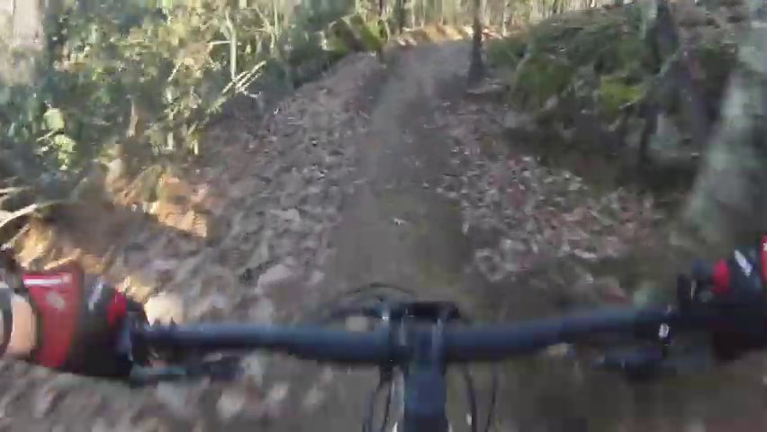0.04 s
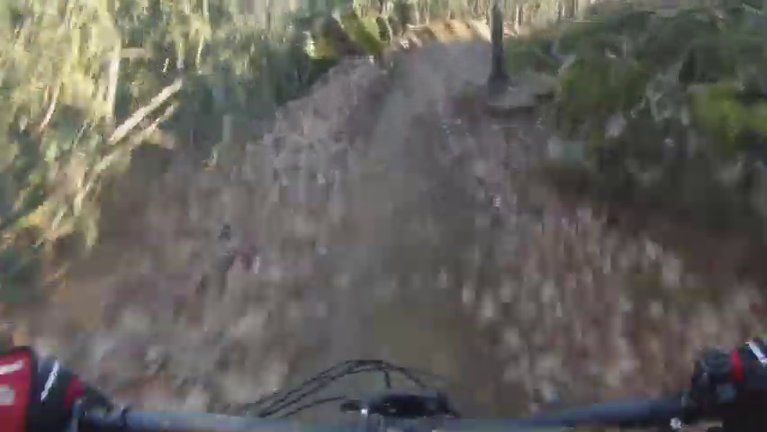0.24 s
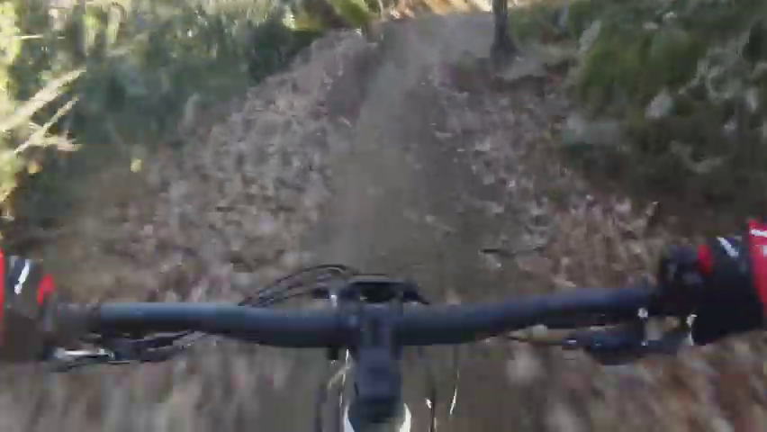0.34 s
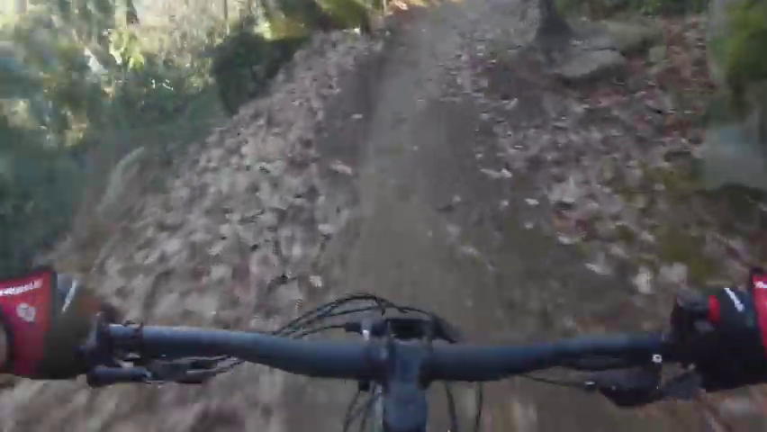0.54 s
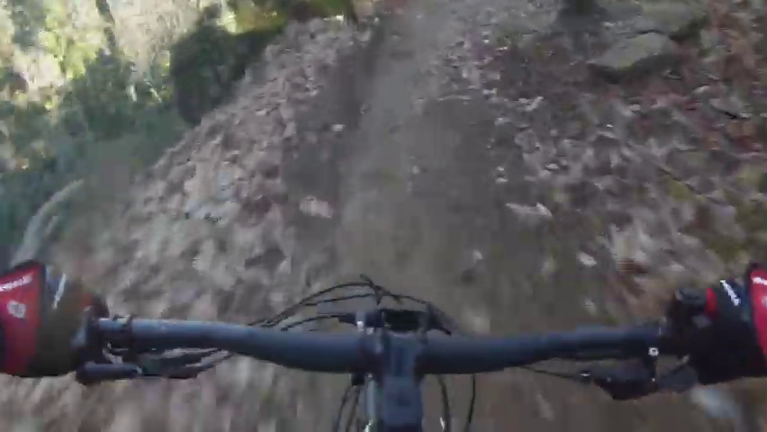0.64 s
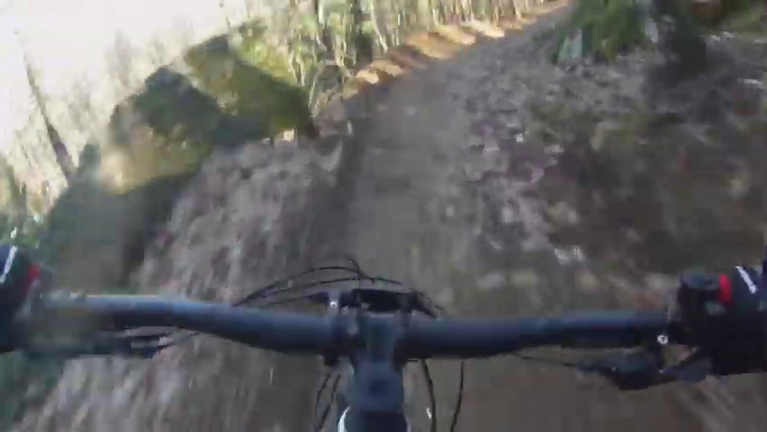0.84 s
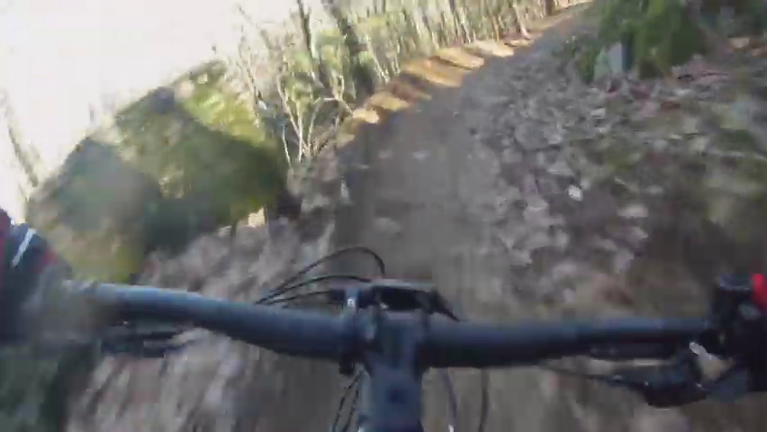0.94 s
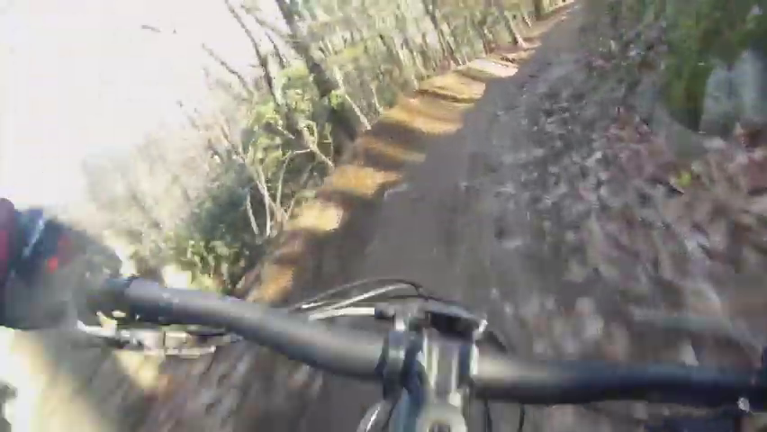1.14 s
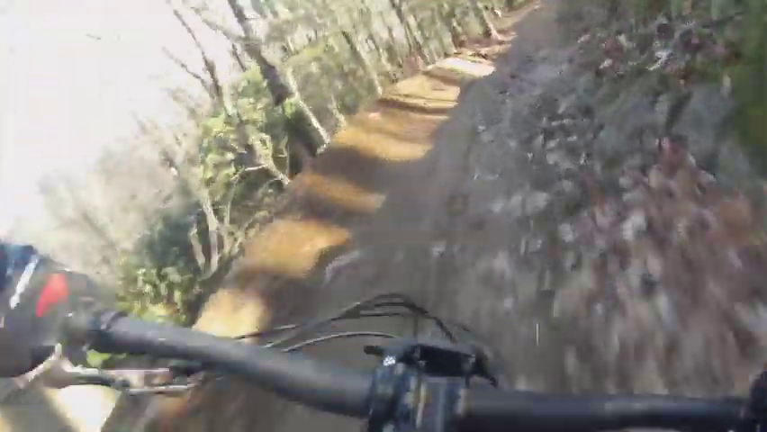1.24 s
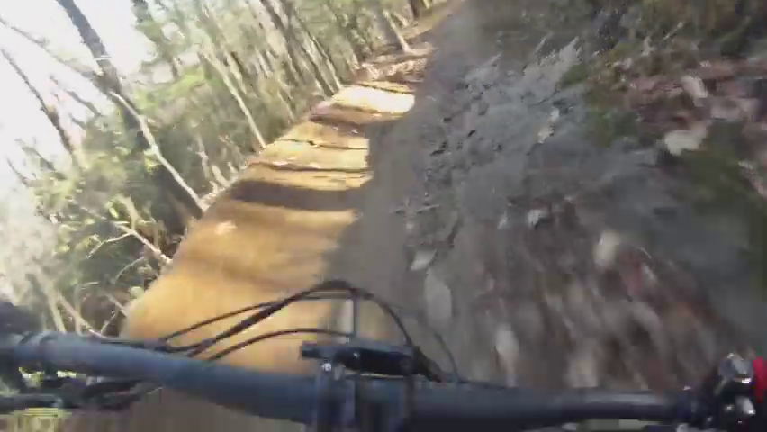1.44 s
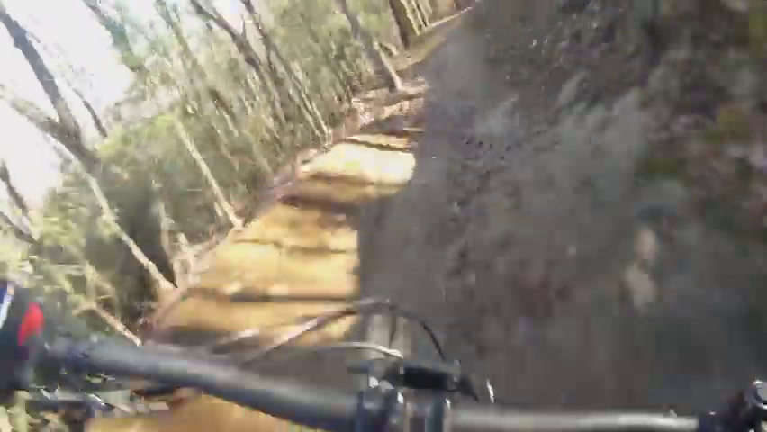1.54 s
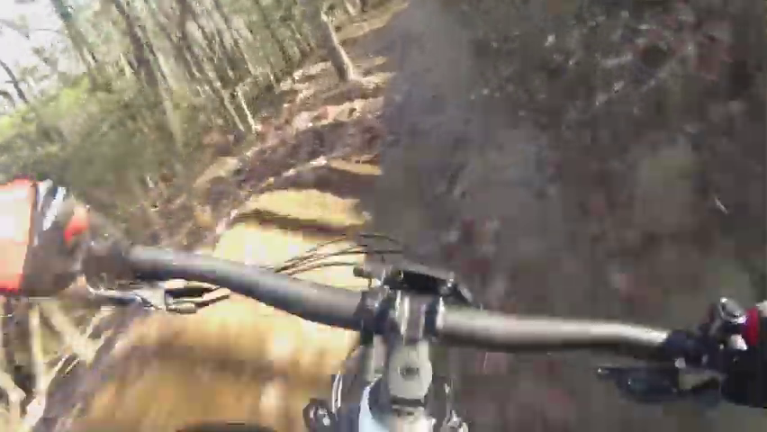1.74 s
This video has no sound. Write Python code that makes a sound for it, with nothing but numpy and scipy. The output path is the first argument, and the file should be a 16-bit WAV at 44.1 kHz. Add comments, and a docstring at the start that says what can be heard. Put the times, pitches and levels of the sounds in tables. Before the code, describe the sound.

A mountain bike knocks and rattles over a dirt trail, with wind buffeting the microphone.

```python
"""A dirt trail, heard from a camera strapped to the chest of a mountain biker riding down it.
Wind buffets the microphone; the tyres rush over dirt and throw up grit and leaves. Bumps thud
through the rider, ping the bike's metal, scuff the harness and make the camera shudder and knock
in its mount. The small plastic housing colours crunch, scuffs and knocks; the hardest knocks overload."""
import sys
import numpy as np
from scipy import signal
from scipy.fft import rfft, irfft
from scipy.io import wavfile

SR = 44100
rng = np.random.default_rng(int(sys.argv[2]) if len(sys.argv) > 2 else 0)


def to_wav(s):
    """Save 16-bit WAV."""
    ch = np.atleast_2d(s).T  # columns
    pcm = np.round(np.clip(ch, -1, 1) * 32767)  # PCM
    wavfile.write(sys.argv[1], SR, pcm.astype(np.int16))


N = 79380
TIME_S = np.arange(N) / SR
METAL_HZ, METAL_WIDTH_HZ = 4720, 160  # ring of the bike's metal parts


def from_db(db):
    """Decibels to gain."""
    return 10 ** (np.asarray(db) / 20)


def unit_rms(x):
    """Scale to unit rms."""
    return x / np.sqrt(np.mean(x ** 2) + 1e-20)


def gain_curves(rows):
    """One gain curve per level column; rows: time_s, level_db, ..."""
    times_s, *columns_db = np.transpose(rows)
    return [from_db(np.interp(TIME_S, times_s, db)) for db in columns_db]


def swells(rows):
    """Envelope of lopsided bell curves, summed in power."""
    power = 0
    for peak_s, level_db, rise_s, fall_s in rows:
        width_s = np.where(TIME_S < peak_s, rise_s, fall_s)
        power += from_db(level_db) ** 2 * np.exp(-2 * ((TIME_S - peak_s) / width_s) ** 2)
    return np.sqrt(power)


def lowpass(x, cutoff_hz, order=2):
    """Butterworth low-pass."""
    return signal.sosfilt(signal.butter(order, cutoff_hz, fs=SR, output="sos"), x)


def drift(rate_hz):
    """Random wander, unit rms."""
    return unit_rms(lowpass(rng.standard_normal(N + SR), rate_hz)[SR:])


def colour(x, points, size=8192):
    """Minimum-phase filter; points: freq_hz, gain_db."""
    freq_hz, gain_db = np.transpose(points)
    bins_hz = np.fft.rfftfreq(size, 1 / SR)
    curve_db = np.interp(np.log(bins_hz + 1), np.log(freq_hz), gain_db)
    cepstrum = irfft(np.log(from_db(curve_db)))
    cepstrum[1:size // 2] *= 2
    cepstrum[size // 2 + 1:] = 0
    return signal.fftconvolve(x, irfft(np.exp(rfft(cepstrum))))[:len(x)]


def resonance(x, centre_hz, width_hz, boost_db):
    """Lift one band so it rings; a negative boost cuts it."""
    band = signal.lfilter(*signal.iirpeak(centre_hz, centre_hz / width_hz, fs=SR), x + 1e-18)
    return x + (from_db(boost_db) - 1) * band


def grains(rate_per_s, spread_db):
    """Tiny clicks at random times."""
    sizes = from_db(spread_db * np.minimum(rng.exponential(1, N), 4)) * rng.choice([-1, 1], N)
    return sizes * (rng.random(N) < rate_per_s / SR)


def housing(x):
    """Resonances of the plastic housing, in series."""
    # modes: centre_hz, width_hz, boost_db
    modes = [(636, 23, 2.5), (1496, 184, 4.5), (2087, 67, 0.5), (2366, 250, 5), (3780, 270, 10),
             (4720, 720, 6), (6150, 600, 4), (11600, 1100, 8)]
    for mode in modes:
        x = resonance(x, *mode)
    return x


def wind(lump_db=2.5, lump_hz=30):
    """Air rushing past the microphone: slow buffeting and a lumpy rumble."""
    # wind strength: time_s, buffet_db, rumble_db
    levels = [(0, -50, -53), (0.07, -42, -48.5), (0.15, -33, -36.5), (0.26, -43, -41), (0.31, -42.5, -56.5),
              (0.38, -51.5, -57), (0.43, -38, -57), (0.48, -48, -59), (0.60, -49.5, -55.5),
              (0.76, -53.5, -51), (0.85, -39.5, -56.5), (0.96, -29, -46.5), (1.04, -37.5, -41),
              (1.16, -30.5, -48), (1.39, -33.5, -41.5), (1.49, -38, -37.5), (1.56, -49.5, -55),
              (1.8, -51, -55)]
    # buffet and rumble spectra: freq_hz, gain_db
    buffet_colour = [(8, -9), (21, -3), (42, -15.5), (70, -16.5), (150, -31), (500, -90.5)]
    rumble_colour = [(25, -50), (60, -7.5), (120, -6), (210, -9), (330, -21.5), (600, -25.5), (2000, -51)]
    buffet_gain, rumble_gain = gain_curves(levels)
    buffet = unit_rms(colour(rng.standard_normal(N + SR), buffet_colour)[SR:])
    rumble = colour(rng.standard_normal(N + SR), rumble_colour)[SR:]
    lumps = from_db(lump_db * drift(lump_hz))
    return buffet_gain * buffet + rumble_gain * unit_rms(rumble * lumps)


def tyres(flutter_db=2, flutter_hz=40):
    """Tread crunches over dirt; the bike's metal sings along."""
    # tyre rush: time_s, level_db
    levels = [(0, -51.5), (0.16, -44.5), (0.27, -83), (0.30, -53), (0.42, -53.5), (0.49, -54.5),
              (0.58, -56), (0.72, -56.5), (0.77, -51.5), (0.87, -49.5), (0.95, -47), (1.06, -49.5),
              (1.19, -41.5), (1.31, -42.5), (1.42, -36.5), (1.52, -39), (1.58, -56.5), (1.8, -58)]
    # crunch spectrum: freq_hz, gain_db
    crunch_colour = [(100, -25), (300, -10), (520, -10.5), (900, -6), (1450, 4), (2200, -2.5),
                     (2900, -10.5), (4500, -24), (6800, -22.5), (9500, -36), (12500, -35.5), (15000, -78)]
    gain, = gain_curves(levels)
    crunch = housing(colour(grains(rate_per_s=4700, spread_db=1.5), crunch_colour))
    crunch = resonance(crunch, METAL_HZ, METAL_WIDTH_HZ, boost_db=7)
    flutter = from_db(flutter_db * drift(flutter_hz))
    return gain * flutter * unit_rms(crunch)


def sprays():
    """Grit and dry leaves thrown up by the tread."""
    # bursts: peak_s, level_db, rise_s, fall_s
    bursts = [(0.362, -61.5, 0.011, .006), (0.89, -63, 0.021, 0.0089), (1.037, -51.5, 0.0051, 0.013),
              (1.130, -59.5, 0.024, .008), (1.182, -53, 0.0046, 0.015), (1.222, -54.5, .003, 0.011),
              (1.262, -51.5, 0.0079, 0.021), (1.308, -46.5, 0.0041, 0.01), (1.345, -43.5, 0.0021, 0.012),
              (1.370, -43.5, .006, 0.015)]
    # grit spectrum: freq_hz, gain_db
    grit_colour = [(1000, -19.5), (3500, -1.5), (6500, 3), (9000, -6.5), (12000, -11.5), (15000, -19.5)]
    grit = colour(grains(rate_per_s=6100, spread_db=5), grit_colour)
    return swells(bursts) * unit_rms(grit)


def pings(t60_s=0.08):
    """Jolts set off a faint, rough, narrow ring in the bike's metal."""
    # jolts: start_s, level_db
    jolts = [(0.006, -59), (0.267, -63.5), (0.311, -56), (0.392, -46)]
    band_hz = [METAL_HZ - METAL_WIDTH_HZ / 2, METAL_HZ + METAL_WIDTH_HZ / 2]
    ring = signal.sosfilt(signal.butter(2, band_hz, "band", fs=SR, output="sos"), rng.standard_normal(N))
    envelope = np.zeros(N)
    for start_s, level_db in jolts:
        decay_db = 60 * np.clip((TIME_S - start_s) / t60_s, 0, 2)
        envelope += (TIME_S > start_s) * from_db(level_db - decay_db)
    return envelope * unit_rms(ring)


def shudder(peak_s=0.228, level_db=-31.5, rise_s=0.043, fall_s=0.034, pitch_hz=122.4):
    """The mount vibrates, low and wavering, under the first big bump."""
    waver = 1 + 0.04 * drift(rate_hz=35)
    phase = 2 * np.pi * np.cumsum(pitch_hz * waver) / SR
    return swells([(peak_s, level_db, rise_s, fall_s)]) * unit_rms(np.sin(phase))


def thuds():
    """The rider takes bumps: one dull pressure pulse each."""
    # bumps: peak_s, level_db, half_width_s
    bumps = [(0.1672, -22, 0.0035), (0.7582, -32, 0.0013), (0.977, -22.5, 0.0015), (1.102, -24.5, 0.0014),
             (1.172, -43, 0.0037), (1.2741, -20, 0.00037), (1.289, -26.5, .0013), (1.374, -25.5, 0.0027),
             (1.397, -25.5, 0.0017)]
    out = np.zeros(N)
    for peak_s, level_db, half_width_s in bumps:
        exponent = ((TIME_S - peak_s) / half_width_s) ** 2 / 2
        out += from_db(level_db) * (1 - exponent) * np.exp(-exponent)
    return out


def scuffs():
    """Dense stick-slip of the harness against the housing."""
    # rubs: peak_s, level_db, rise_s, fall_s
    rubs = [(0.047, -43.5, 0.014, 0.0098), (0.122, -32.5, 0.021, 0.013), (0.190, -30, 0.016, 0.026),
            (0.216, -20, 0.0049, 0.005), (0.231, -18, 0.015, 0.012), (0.263, -10, 0.0086, 0.0064),
            (0.281, -31.5, 0.0026, 0.0037), (0.313, -55, 0.0033, 0.032), (0.364, -50, 0.026, 0.002),
            (0.636, -42, 0.017, 0.014), (0.963, -37, 0.0053, 0.0074), (1.000, -40.5, 0.015, 0.0098),
            (1.024, -34.5, 0.0086, 0.015), (1.132, -38, 0.03, 0.014), (1.266, -34, 0.006, 0.024),
            (1.348, -30, 0.011, 0.0052), (1.378, -39, 0.006, 0.011), (1.440, -29.5, 0.012, 0.017),
            (1.455, -21.5, 0.0037, 0.013), (1.468, -24, 0.0092, 0.0086), (1.498, -23.5, 0.0053, 0.0043),
            (1.515, -36, 0.006, 0.0056), (1.547, -39, 0.005, 0.017), (1.612, -41.5, 0.024, 0.026),
            (1.685, -46.5, 0.029, 0.041)]
    # friction spectrum: freq_hz, gain_db
    slip_colour = [(100, -22.5), (400, -11.5), (520, -18.5), (670, -7), (1000, -2.5), (1600, 0),
                   (2100, 2.5), (2900, -14.5), (4500, -23.5), (6300, -22), (9500, -41), (12500, -45),
                   (15000, -52)]
    slips = colour(grains(rate_per_s=9000, spread_db=0), slip_colour)
    return swells(rubs) * unit_rms(housing(slips))


def knocks(thump_hz=170.7, thump_t60_s=0.013, tail_db=-22, tail_t60_s=0.039, size=4096):
    """Each contact rings the housing, echoes in the mount and leaves a faint tail and a low thump."""
    # camera hits mount: start_s, level_db, bright_hz, ring_db, echo_gain, thump_relative_db
    contacts = [(0.0289, -29, 2370, 11, 0.59, -21), (0.0454, -31, 3880, 0, 1.1, 1),
                (0.2598, -8.5, 1670, 10, 1.2, -32), (0.2649, 10, 3660, 5.5, 0.91, -23),
                (0.3926, -1.5, 3780, 0.5, 1.61, -17), (0.8035, -32.5, 1194, -7, 0.81, 2),
                (0.9021, -2, 3150, 2.5, 0.74, -14), (1.0721, -9.5, 1380, 0, 1.05, -7),
                (1.0747, -17.5, 1460, 6.5, 0.21, -41), (1.1661, -30.5, 1200, 6, 1, 7),
                (1.2739, -13.5, 2160, 47, 0.23, -16), (1.2753, -8, 2250, 22, 0.6, -40),
                (1.3472, -23, 4000, -5, 2, -10), (1.4506, -14.5, 2040, 14, 0.68, -10),
                (1.4665, -12, 694, 6.5, 1, -38), (1.5060, 3, 3470, 1.5, 1.26, -32)]
    # contact spectrum: freq_hz, gain_db
    contact_colour = [(100, -43), (220, -16), (340, -13), (500, -14), (700, -6.5), (1080, 6.5), (1550, 9),
                      (2300, -6.5), (3700, -3), (5200, -13.5), (7800, -9.5), (9300, -23), (15000, -37)]
    # reflections inside the mount: delay_s, relative_gain
    reflections = [(0.00078, -0.39), (0.00124, -.15), (0.00243, -.5)]
    age_s = np.arange(size) / SR
    bins_hz = np.fft.rfftfreq(size, 1 / SR)
    body = housing(colour(-signal.unit_impulse(size), contact_colour))
    echoes = sum(gain * np.exp(-2j * np.pi * bins_hz * delay_s) for delay_s, gain in reflections)
    thump = np.sin(2 * np.pi * thump_hz * age_s) * from_db(-60 * age_s / thump_t60_s)
    out = np.zeros(N + size)
    for start_s, level_db, bright_hz, ring_db, echo_gain, thump_relative_db in contacts:
        push = resonance(lowpass(body, bright_hz), bright_hz, 0.12 * bright_hz, ring_db)
        push /= np.abs(push).max()
        tail = rng.standard_normal(size) * from_db(-60 * age_s / tail_t60_s)
        scatter = from_db(tail_db) * rfft(tail / np.linalg.norm(tail))
        hit = irfft(rfft(push) * (1 + echo_gain * echoes + scatter))
        start = int(start_s * SR)
        out[start:start + size] += from_db(level_db) * (hit + from_db(thump_relative_db) * thump)
    return out[:N]


def scene():
    """All sources at one microphone, close and dry."""
    return (knocks() + thuds() + pings() + scuffs() + tyres() + sprays() + wind() + shudder())[None]


def record(dry):
    """Overload flattens the loudest peaks; the treble rolls off and the top is cut."""
    ceiling, hardness = 0.86, 14
    treble_hz, cutoff_hz = 9000, 15200
    clipped = dry / (1 + np.abs(dry / ceiling) ** hardness) ** (1 / hardness)
    dulled = lowpass(clipped, treble_hz, order=1)
    return signal.sosfilt(signal.ellip(10, 0.1, 80, cutoff_hz, fs=SR, output="sos"), dulled)


dry = scene()
out = record(dry)
to_wav(out)
```